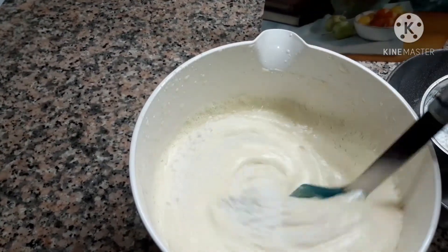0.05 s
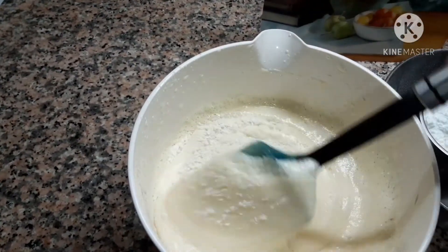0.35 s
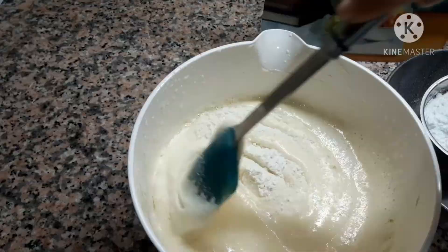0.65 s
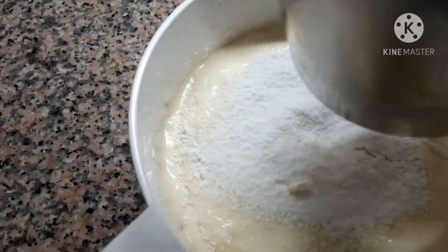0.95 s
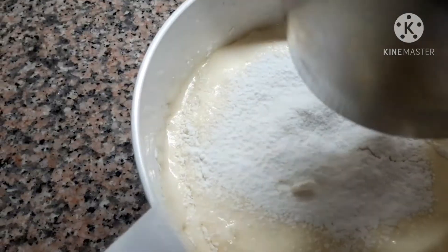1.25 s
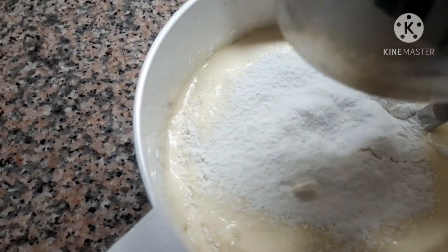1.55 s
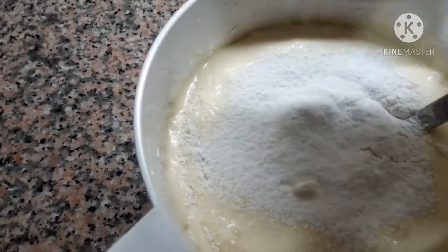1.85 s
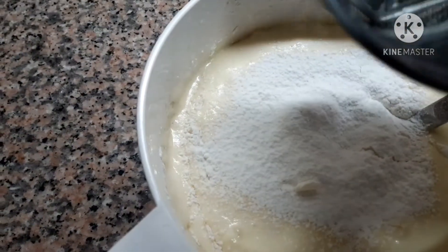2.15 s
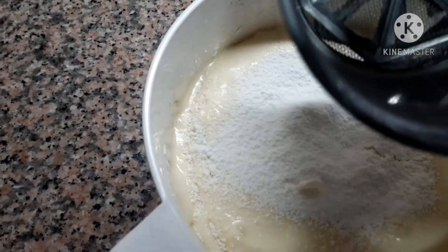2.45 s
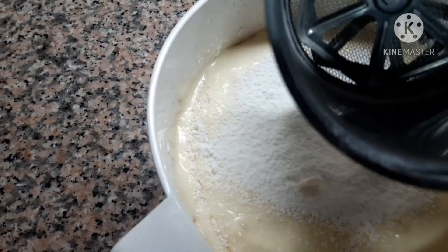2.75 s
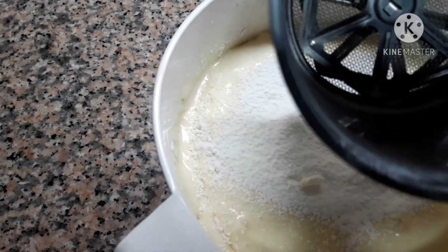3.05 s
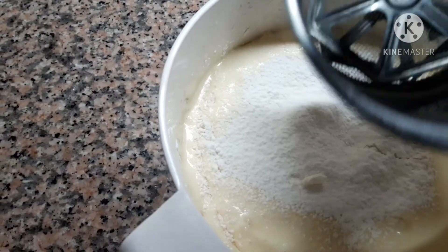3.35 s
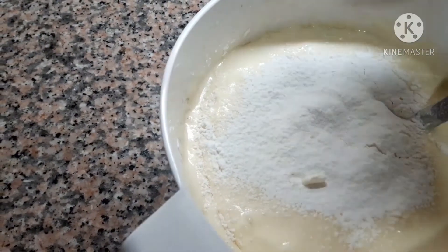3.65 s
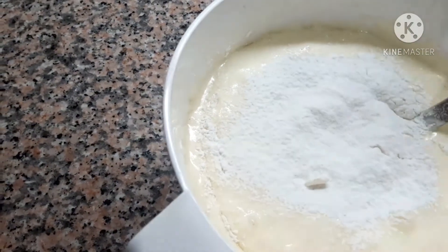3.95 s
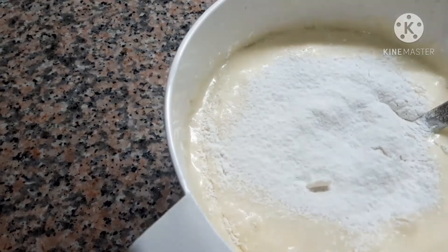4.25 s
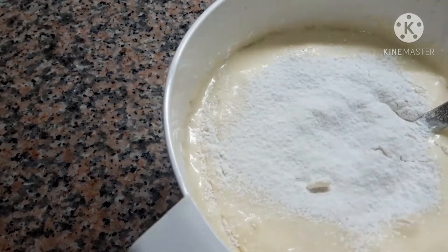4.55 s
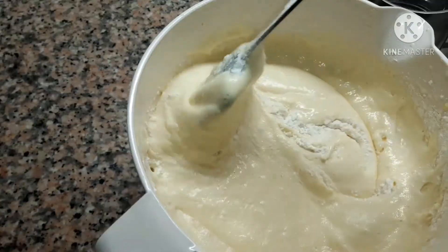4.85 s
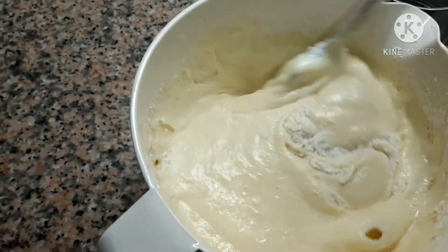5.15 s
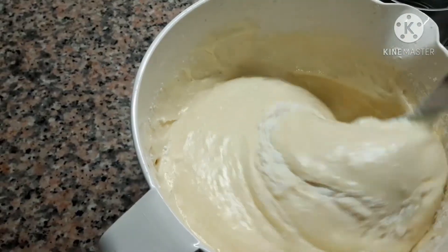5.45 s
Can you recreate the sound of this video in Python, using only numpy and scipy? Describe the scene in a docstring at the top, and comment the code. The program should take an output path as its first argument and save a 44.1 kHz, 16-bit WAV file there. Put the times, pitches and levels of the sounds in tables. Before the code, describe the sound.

Quick metallic sifter rasps end in a ringing clack; later, faint batter folding and one sharp knock on a plastic bowl in a quiet kitchen.

```python
"""A steel squeeze sifter sifts flour in six quick strokes, close by: its blades rasp over the mesh,
then the handle snaps home and rings the cup. Before and after, a spatula folds foamy batter in a
plastic bowl: the batter churns, fizzes and plops, and the blade knocks on the wall and rubs along it.
Underneath sit a dull counter rumble, a faint squeak and rustle, and a fridge humming in a small kitchen."""
import sys
import numpy as np
from scipy import signal
from scipy.fft import rfft, irfft
from scipy.io import wavfile
from scipy.ndimage import uniform_filter1d

SR = 44100
rng = np.random.default_rng(int(sys.argv[2]) if len(sys.argv) > 2 else 0)


def wav_out(sig):
    """Save sig, one row per channel (or a flat mono array), as 16-bit PCM at SR to the path in sys.argv[1]."""
    wavfile.write(sys.argv[1], SR, np.round(np.clip(np.atleast_2d(sig).T, -1, 1) * 32767).astype(np.int16))


N = 242581
TIME = np.arange(N) / SR


# squeezes and releases of the handle: (start [s], rise [s], length [s], level [dB])
SIFT_STROKES = [(0.7925, 0.062, 0.083, -33), (0.95, 0.029, 0.16, -25), (1.122, .012, .08, -28),
                (1.281, 0.042, 0.3, -26), (1.475, .028, .125, -30), (1.614, 0.054, 0.06, -25)]
# accents where the blades catch: (time [s], level [dB], length [s], brightness [dB/octave])
BLADE_CATCHES = [(0.935, -18.5, 0.0039, 4), (0.976, -18, 0.036, 6.5), (1.0446, -15.5, 0.0062, -2.5),
                 (1.046, -11, 0.007, 3), (1.301, -11, .007, 4), (1.391, -15.5, 0.0092, -2.5)]
# tone of blades on mesh: (frequency [Hz], level [dB])
MESH_EQ = [(60, -31), (150, -10), (400, -11), (800, -3.5), (1400, -1), (2100, 0.5), (2700, -2), (4400, -4),
           (6200, -2), (6800, -6.5), (7600, -1.5), (12000, -3), (15500, -7)]
# resonances of mesh and cup: (frequency [Hz], width [Hz], level [dB])
CUP_PEAKS = [(1303, 14, 1), (2018, 16, 0), (2119, 36, 0), (2435, 26, 4), (3266, 14, 2), (3812, 50, -2),
             (4667, 16, 1), (5077, 20, 1), (5880, 90, 2), (7883, 16, 2), (8033, 16, 1), (11400, 50, 0),
             (13124, 14, 3)]

def sifter():
    """Blades chatter over thousands of wires a second, biting as each stroke starts and catching at times."""
    force = strokes(SIFT_STROKES, below_db=9.1, sag_db_per_s=130, stop_db_per_s=270)
    force *= gain_of(0.5 + 0.29 * wander(83))
    rasp = force * grains(per_s=10000, spread_db=0.3)
    bites = [(start, db + 0.38, 0.031, -1.8) for start, _, _, db in SIFT_STROKES]  # short, dull catches
    for start, db, length, brightness in bites + BLADE_CATCHES:
        tilt = [(500, -3 * brightness), (16000, 2 * brightness)]
        scratch = tint(burst(t60=3 * length), tilt)
        add(rasp, start, gain_of(db - 1.5) * scratch)
    sound = tint(shimmer(rasp, depth_db=4.0, hz=17), MESH_EQ, CUP_PEAKS, peak_db=6)
    lows = signal.sosfiltfilt(signal.butter(2, 2800, fs=SR, output="sos"), sound)
    highs = sound - lows
    # the cup's wall swings towards one microphone and away from the other
    wall = lows - 0.32 * lows[::-1]
    return kitchen(wall * pan(-5.0) + highs * pan(-3.3), wet_db=-6.5)


# the handle snaps home: (time [s], level [dB])
HANDLE_SNAPS = [(1.6657, -6.5)]
# ring of the steel cup: (frequency [Hz], level [dB], t60 [s])
STEEL_MODES = [(175, -10, .1), (228, -8, .11), (522, -15, .16), (900, -10, .08), (1301, 0, .21),
               (1555, -5, .07), (1825, -16, .17), (2437, -7, .21), (2622, -35, .75), (4428, -20, .26),
               (4815, -16, .18)]
# tone of the handle's clatter: (frequency [Hz], level [dB])
CLATTER_EQ = [(40, -25), (75, -14.5), (180, -4), (400, -2), (600, 4.5), (1000, 1), (1800, -3), (2700, -6),
              (5000, -7.5), (8000, -15), (15500, -24)]

def handle_snap():
    """The handle hits its stop: one sharp swing of the cup's wall, a clatter, and the ring of steel."""
    swing, clatter, steel = np.zeros((3, 2, N))
    pulse_time = (TIME[:256] - .0005) / 0.00017  # in pulse widths
    pulse = pulse_time * np.exp((1 - pulse_time ** 2) / 2)
    for start, db in HANDLE_SNAPS:
        add(swing, start, gain_of(db) * pulse)
        add(clatter, start, gain_of(db - 13.5) * burst(t60=.12))
        add(steel, start, gain_of(db - 4.5) * ring(STEEL_MODES, phase_spread=2.2))
    clatter = tint(clatter - 0.77 * clatter[::-1], CLATTER_EQ)  # wide: the sides are largely out of phase
    snap = (swing + clatter) * pan(-0.5) + steel * pan(-8.0)
    return kitchen(high_pass(snap, hz=69.1), wet_db=-14.0)


# spatula hits on the bowl: (time [s], level [dB], click hardness [dB])
BOWL_HITS = [(0.767, -46, 5.5), (4.515, -42, -7), (4.553, -39, -4), (4.8487, -14.5, 2), (4.8604, -33, 5),
             (5.132, -48, 1), (5.375, -54, -7)]
# body of the filled plastic bowl: (frequency [Hz], level [dB], t60 [s])
BOWL_MODES = [(248, 1.5, 0.076), (347.6, -13, 0.14), (477, 5, 0.098), (534, 4.5, 0.13), (589.6, -12, .08),
              (607, -14, 0.12), (695, -10, 0.11), (745, -12, 0.154), (1175, -7, 0.0527), (1370, -18.5, .08),
              (1837, -20.5, 0.092)]
# tone of the click on plastic: (frequency [Hz], level [dB])
CLICK_EQ = [(100, -36), (300, -7), (900, -6.5), (1700, -3), (2800, -18), (4400, -13.5), (5600, -5),
            (9000, -10.5), (15000, -8.5)]
# resonances of the spatula's stiff handle, also in the rub: (frequency [Hz], width [Hz], level [dB])
SPATULA_PEAKS = [(1329, 34, 10.5), (1886, 81, 4.5), (3530, 90, 4), (5160, 80, -0.5), (6000, 91, 5.5),
                 (7000, 60, -0.5), (8540, 130, 2.5), (9500, 90, -11)]

def bowl_knocks():
    """The spatula bumps the batter-damped bowl; its handle rattles briefly, and the rattle breaks off short."""
    body, click = np.zeros((2, 2, N))
    for start, db, hardness_db in BOWL_HITS:
        add(body, start, gain_of(db + 1) * ring(BOWL_MODES, phase_spread=1.0))
        rattle = burst(t60=0.16)
        cut_off = 1 / (1 + (TIME[:rattle.shape[1]] / .055) ** 8)
        add(click, start, gain_of(db + hardness_db - 17.5) * rattle * cut_off)
    body = high_pass(high_pass(body, hz=180), hz=134)
    click = tint(click, CLICK_EQ, SPATULA_PEAKS, peak_db=0.5)
    return kitchen(body * pan(-1.5) + click * pan(-5.5), wet_db=-22.0)


# air pockets closing in the batter: (time [s], level [dB], pitch [Hz])
AIR_POCKETS = [(0.058, -43, 675), (0.062, -45, 505), (0.156, -46, 502), (0.159, -48, 730),
               (4.5141, -38.5, 364), (4.528, -36.5, 310), (4.571, -43, 671), (4.579, -41, 310)]

def plops():
    """Each pocket of air rings for a few cycles in the thick batter."""
    t, sound = TIME[:4096], np.zeros((2, N))
    envelope = (1 - np.exp(-t / 0.0011)) * np.exp(-t / 0.0066)
    for start, db, hz in AIR_POCKETS:
        add(sound, start, gain_of(db + 0.5) * envelope * np.sin(2 * np.pi * hz * t))
    return kitchen(sound * pan(-2.5), wet_db=-7)


# a push down the wall, then a slide along it: (start [s], rise [s], length [s], hiss [dB], drag [dB])
RUB_STROKES = [(4.508, 0.033, 0.057, -54, -53.5), (4.64, 0.12, 0.22, -63, -72.5)]
# hissy top of the rub: (frequency [Hz], level [dB])
HISS_EQ = [(2500, -21), (4700, -9), (6100, -1.5), (6900, -4), (8200, -1.5), (11000, -5.5), (15000, -8)]
# dragging body of the rub: (frequency [Hz], level [dB])
DRAG_EQ = [(120, -14.5), (320, 14), (480, 2.5), (700, 8.5), (950, -11), (1300, -8.5), (2050, -2),
           (2700, -16), (3500, -10), (5000, -21)]

def wall_rub():
    """The blade drags along the plastic wall in tiny slips that ring the spatula."""
    shape = dict(below_db=4.3, sag_db_per_s=15, stop_db_per_s=180)
    hiss = tint(grains(per_s=10000, spread_db=0.0), HISS_EQ, SPATULA_PEAKS, peak_db=7.0)
    hiss *= gain_of(2.0) * strokes(RUB_STROKES, **shape)
    drag = tint(grains(per_s=2500, spread_db=0.5), DRAG_EQ, SPATULA_PEAKS, peak_db=1.0)
    drag *= gain_of(2.5) * strokes(RUB_STROKES, **shape, db_column=4)
    return kitchen((hiss + drag) * pan(-6.5), wet_db=-6.0)


# spatula sweeps through the batter: (start [s], rise [s], length [s], fizz [dB], churn [dB])
FOLD_STROKES = [(0.0, 0.054, 0.17, -69, -57.5), (0.2, 0.15, 0.69, -70, -67.5), (3.68, 0.44, 1, -78.5, -75),
                (4.99, 0.25, 0.41, -66.5, -62.5), (5.368, 0.011, .11, -67, -56)]
# bright fizz of bursting foam: (frequency [Hz], level [dB])
FOAM_EQ = [(600, -13.5), (1200, 2), (2400, -1.5), (3600, -1.5), (5000, -3), (8500, -1.5), (11500, -1.5),
           (15500, -2.5)]
# thick churn of batter: (frequency [Hz], level [dB])
BATTER_EQ = [(100, -6.5), (250, -1), (500, -7.5), (740, -1), (950, -10.5), (1600, -20.5), (3000, -26)]
# single bubbles bursting: (time [s], level [dB])
BUBBLE_POPS = [(3.956, -48), (5.267, -43), (5.2874, -35)]

def folding():
    """Batter churns under the blade while its foam fizzes; a few larger bubbles pop."""
    shape = dict(below_db=1.6, sag_db_per_s=19, stop_db_per_s=240)
    foam = shimmer(grains(per_s=26000, spread_db=4.5), depth_db=1, hz=9.2)
    fizz = gain_of(0.5) * strokes(FOLD_STROKES, **shape) * tint(foam, FOAM_EQ)
    push = strokes(FOLD_STROKES, **shape, db_column=4) * gain_of(-4.5 + 1.5 * wander(25))
    churn = push * tint(diffuse(), BATTER_EQ)
    pops = np.zeros((2, N))
    for start, db in BUBBLE_POPS:
        add(pops, start, gain_of(db - 12) * burst(t60=0.013))
    pops = tint(pops, [(1500, -6), (5000, 0), (10000, -1), (15000, 1)])
    return kitchen((fizz + pops) * pan(-2.8) + churn * pan(-7), wet_db=-8)


# things shifted on the counter: (start [s], rise [s], length [s], level [dB])
COUNTER_MOVES = [(0.0, 0.05, .75, -65), (.78, .02, 0.057, -60.5), (1.35, 0.18, 0.36, -63),
                 (4.52, .03, .1, -66), (5.36, .02, 0.054, -68)]

def counter_rumble():
    """Dull bass from things being moved about, over an uneven floor that never quite stops."""
    bass = tint(diffuse(), [(25, -32.0), (50, -10.5), (90, 2.5), (130, -6.5), (220, -20), (500, -54.5)])
    floor = gain_of(-77 + 3 * wander(2.5))
    moves = strokes(COUNTER_MOVES, below_db=4, sag_db_per_s=4, stop_db_per_s=110)
    return gain_of(-2.0) * np.hypot(floor, moves) * bass * pan(-1.4)


# swells of a faint squeak: (start [s], length [s], level [dB])
SQUEAK_SWELLS = [(.54, 0.24, -68), (1.985, 0.12, -78.5)]
# its hollow tones: (frequency [Hz], width [Hz], level [dB])
SQUEAK_BANDS = [(1155, 73, -4.5), (1930, 51, -15.5)]

def squeak():
    """Narrow, fuzzy tones swell and fade in one arch each time."""
    swell, tones = np.zeros((2, N))
    for start, length, db in SQUEAK_SWELLS:
        swell += gain_of(db) * np.sin(np.pi * np.clip((TIME - start) / length, 0, 1))
    for hz, width, db in SQUEAK_BANDS:
        fuzz = wander(width / 2) + 1j * wander(width / 2)
        tones += gain_of(db) * np.real(fuzz * np.exp(2j * np.pi * hz * TIME))
    return swell * tones * pan(-7)


# rustle of things held in the hand: (frequency [Hz], level [dB])
GRIP_EQ = [(500, -14.5), (800, -2), (1800, -3.5), (2600, -13), (5000, -12), (8200, -7.5), (15000, -14)]
# its resonances: (frequency [Hz], width [Hz], level [dB])
GRIP_PEAKS = [(1840, 130, 8.1), (7250, 180, 4.6), (8200, 420, 10)]

def grip_rustle():
    """The hand shifts its grip now and then: faint swells of fine friction."""
    swell = gain_of(-84.5 + 6 * np.minimum(wander(4), 2))
    friction = tint(grains(per_s=13000, spread_db=1.0), GRIP_EQ, GRIP_PEAKS)
    return swell * friction * pan(-3.5)


# hum of the fridge motor: (frequency [Hz], level [dB], left minus right [dB])
MOTOR_HUM = [(50, -81, -3), (92.8, -78, -2.5), (147.4, -65.5, -2), (196.6, -70, -7), (251, -80, -12.5),
             (295, -72, -6), (343, -74.5, 2), (443.4, -67, -11), (503.7, -73.5, -8.5)]
# fader ride of its thin whine: (time [s], level [dB])
WHINE_RIDE = [(0, -87), (3.0, -78.5), (4.8, -83), (4.93, -73), (5.5, -70)]

def fridge():
    """The motor hums in wavering partials, with a thin whine on top."""
    hum = np.zeros((2, N))
    for hz, db, left_db in MOTOR_HUM:
        turns = hz * TIME + 0.023 * wander(7.3) + rng.random()
        hum += pan(left_db) * gain_of(db + 1.4 * wander(8.4)) * np.sqrt(2) * np.sin(2 * np.pi * turns)
    whine_hz = 2805
    whine_db = np.interp(TIME, *np.transpose(WHINE_RIDE)) + 2 + 1.2 * wander(14)
    whine = gain_of(whine_db) * np.sin(2 * np.pi * (whine_hz * TIME + .03 * wander(13)))
    return hum + whine * pan(-4.5)


# air of the kitchen: (frequency [Hz], level [dB])
AIR_EQ = [(25, -24), (48, 0.5), (68, -6.5), (92, -1), (125, -4.5), (230, 0), (480, -3), (580, -7),
          (760, -10), (1050, -20), (2500, -23.5), (2830, -12.5), (3200, -24), (5000, -26), (8200, -27),
          (15000, -30.5)]

def room_tone():
    """The air of the room lays a soft, nearly steady bed of noise."""
    level = gain_of(-68 + .5 * wander(2.8))
    air = tint(shimmer(diffuse(), depth_db=1.5, hz=8.2), AIR_EQ)
    return level * air * pan(-4.0)


# reverb decay of the kitchen: (frequency [Hz], t60 [s])
KITCHEN_DECAY = [(150, 0.37), (600, 0.27), (2000, 0.29), (6000, 0.28), (14000, .22)]

def kitchen(x, wet_db):
    """Adds the room: sparse reflections of random sign, each band dying at its own speed."""
    size = SR // 2
    signs = rng.choice([-1., 1.], (2, size))
    taps = signs * (rng.random((2, size)) < 4000 / SR) * (TIME[:size] > .003)
    hz, t, bands = signal.stft(taps, SR, nperseg=256)
    decay = gain_of(-60 * t / curve_at(KITCHEN_DECAY, hz)[:, None])
    tail = signal.istft(bands * decay, SR, nperseg=256)[1]
    tail /= np.linalg.norm(tail, axis=1, keepdims=True)
    return x + gain_of(wet_db) * signal.fftconvolve(x, tail, axes=1)[:, :N]


# left-right likeness of diffuse sound: (frequency [Hz], coherence [0-1])
STEREO_COHERENCE = [(60, 0.8), (300, 0.6), (640, 0.6), (1400, 0), (15000, 0)]

def diffuse():
    """White noise at two microphones, alike in the bass."""
    left, unrelated = rfft(rng.standard_normal((2, N)))
    same = curve_at(STEREO_COHERENCE, np.fft.rfftfreq(N, 1 / SR))
    right = same * left + np.sqrt(1 - same ** 2) * unrelated
    return irfft(np.array([left, right]), N)


def strokes(rows, below_db, sag_db_per_s, stop_db_per_s, db_column=3, contact_s=0.018):
    """Envelope of hand movements: each makes contact, rises by below_db, sags, and stops after its length."""
    power = np.zeros(N)
    for row in rows:
        start, rise, length = row[:3]
        t = TIME - start
        contact = np.clip(1 + t / contact_s, 0, 1) ** 2
        speeding_db = below_db * np.clip(1 - t / rise, 0, 1)
        slowing_db = sag_db_per_s * np.maximum(t - rise, 0) + stop_db_per_s * np.maximum(t - length, 0)
        power += (contact * gain_of(row[db_column] - speeding_db - slowing_db)) ** 2
    return np.sqrt(power)


def grains(per_s, spread_db):
    """Tiny random clicks of uneven size, reaching each microphone with their own strength."""
    size = gain_of(spread_db * np.minimum(rng.exponential(1, N), 4))
    fires = rng.random(N) < per_s / SR
    return unit_rms(size * fires * rng.standard_normal((2, N)))


def burst(t60, size=8192):
    """Stereo noise that dies away."""
    return rng.standard_normal((2, size)) * gain_of(-60 * TIME[:size] / t60)


def ring(modes, phase_spread, size=16384):
    """Free ring of a struck body, of peak 1; each mode reaches the two microphones with its own phase."""
    t = TIME[:size]
    phases = phase_spread * rng.uniform(.6, 1, (len(modes), 1, 1)) * np.array([[-.5], [.5]])
    sound = sum(gain_of(db - 60 * t / t60) * np.sin(2 * np.pi * hz * t + phase)
                for (hz, db, t60), phase in zip(modes, phases))
    return sound / abs(sound).max()


def tint(x, eq, peaks=(), peak_db=0, size=4096):
    """Minimum-phase filter of unit energy: a broad EQ curve with resonances standing on it."""
    hz = np.fft.rfftfreq(size, 1 / SR)
    lift = 1 + sum(gain_of(db + peak_db) ** 2 / (1 + (2 * (hz - centre) / width) ** 2)
                   for centre, width, db in peaks)
    magnitude = gain_of(curve_at(eq, hz)) * np.sqrt(lift)
    cepstrum = irfft(np.log(magnitude + 1e-5))
    causal = np.r_[1, np.full(size // 2 - 1, 2), np.zeros(size // 2)]
    taps = irfft(np.exp(rfft(cepstrum * causal)))
    return signal.oaconvolve(x, taps[None] / np.linalg.norm(taps), axes=1)[:, :x.shape[1]]


def shimmer(x, depth_db, hz):
    """Narrow bands swell and fade while the whole keeps its level."""
    bands = signal.stft(x, SR, nperseg=512, noverlap=384)[2]
    field = rng.standard_normal(bands.shape)
    frames = max(1, round(SR / 128 / hz))
    for _ in range(2):
        field = uniform_filter1d(field, size=2, axis=1)
        field = uniform_filter1d(field, size=frames, axis=2)
    ripple = gain_of(depth_db * unit_rms(field))
    ripple /= np.sqrt(np.mean(ripple ** 2, axis=1, keepdims=True))
    return signal.istft(bands * ripple, SR, nperseg=512, noverlap=384)[1][:, :N]


def wander(hz):
    """Random drift of rms 1, up to a rate."""
    rolloff = 1 + (np.fft.rfftfreq(N, 1 / SR) / hz) ** 4
    return unit_rms(irfft(rfft(rng.standard_normal(N)) / rolloff, N))


def high_pass(x, hz):
    """Low cut: takes away the deepest bass."""
    return signal.sosfilt(signal.butter(2, hz, "high", fs=SR, output="sos"), x)


def gain_of(db):
    """Decibels to gain."""
    return 10 ** (np.asarray(db) / 20)


def unit_rms(x):
    """Scales to rms 1."""
    return x / np.sqrt(np.mean(x ** 2) + 1e-20)


def curve_at(points, hz):
    """Reads a table on a log-frequency axis."""
    f, value = np.transpose(points)
    return np.interp(np.log(hz + 1), np.log(f + 1), value)


def pan(left_db):
    """Stereo gains for a left-minus-right level."""
    return gain_of(np.array([[left_db], [-left_db]]) / 2)


def add(mix, start, sound):
    """Drops a sound into the mix at a time in seconds."""
    part = mix[:, round(start * SR):][:, :sound.shape[-1]]
    part += sound[..., :part.shape[1]]


def scene():
    """The stereo mix: sifter in front, then the bowl, then the background."""
    sifting = sifter() + handle_snap()
    bowl = bowl_knocks() + plops() + wall_rub() + folding()
    background = counter_rumble() + fridge() + room_tone() + squeak() + grip_rustle()
    return sifting + bowl + background


def record(dry):
    """A steep high cut takes off the very top."""
    edge_hz = 15650
    high_cut = signal.firwin(401, edge_hz, window=("kaiser", 8), fs=SR)
    return signal.oaconvolve(dry, high_cut[None], "same", axes=1)


dry = scene()
out = record(dry)
wav_out(out)
```